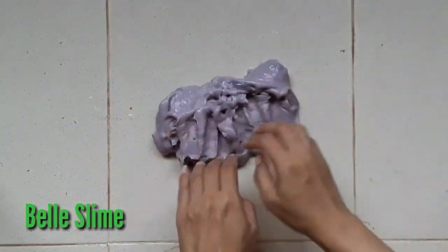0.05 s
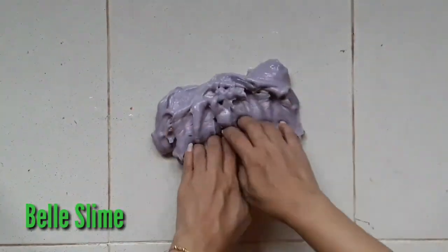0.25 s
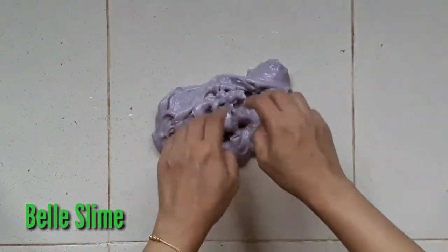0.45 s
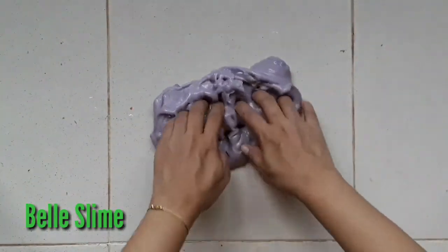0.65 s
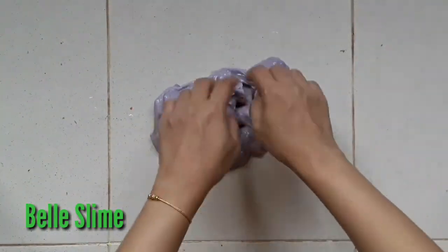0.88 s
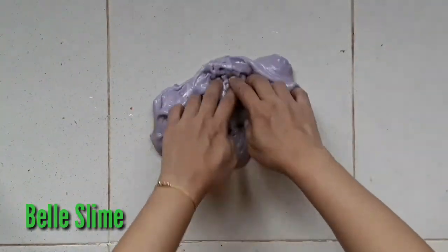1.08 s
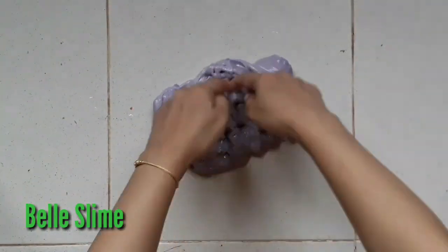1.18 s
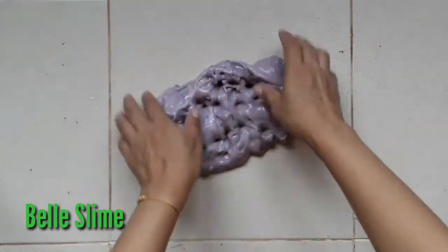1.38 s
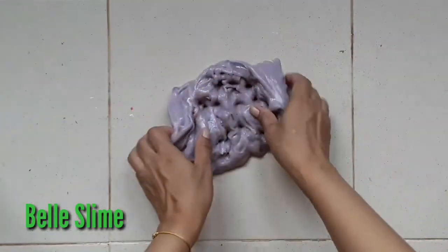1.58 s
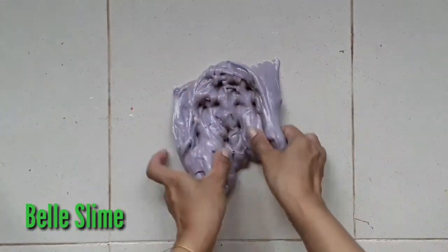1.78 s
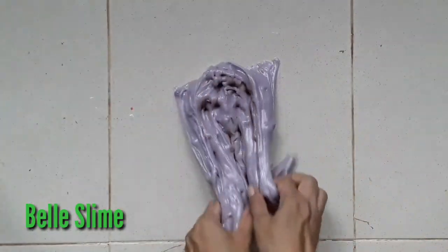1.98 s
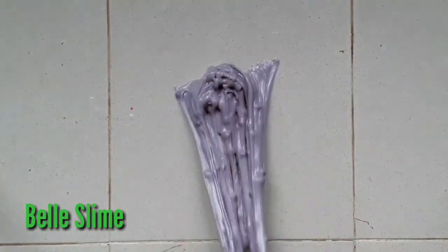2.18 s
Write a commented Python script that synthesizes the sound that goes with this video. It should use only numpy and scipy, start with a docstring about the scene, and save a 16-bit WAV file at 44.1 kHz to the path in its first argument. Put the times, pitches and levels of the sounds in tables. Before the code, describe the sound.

Sticky slime poked and folded by hand, wet air pockets snapping and small bubbles crackling

```python
"""A tiled floor in a bare room: fingers poke and fold sticky slime under a phone. Air pockets burst as
short wet snaps (filtered clicks roughened by brief tearing noise). Small bubbles crackle and squeak
(random clicks, some through a narrow resonance). Floor and wall echo each burst at once and the room
rings on for just under half a second (decaying noise), over room noise and faint hums (noise, sines)."""
import sys
import numpy as np
from scipy import signal
from scipy.fft import rfft, irfft
from scipy.io import wavfile
from scipy.ndimage import uniform_filter1d

SR = 44100
rng = np.random.default_rng(int(sys.argv[2]) if len(sys.argv) > 2 else 0)


def waveform_to_disk(signal):
    """Save audio, clipped to [-1, 1], as 16-bit WAV at the path in sys.argv[1]."""
    frames = np.transpose(np.atleast_2d(signal))
    scaled = np.clip(frames, -1, 1) * 32767
    samples = np.round(scaled).astype(np.int16)
    wavfile.write(sys.argv[1], SR, samples)


N = 99225
LEAD_S = 0.4  # rendered ahead of the start, then cut
LEAD = int(LEAD_S * SR)
M = N + LEAD


def undb(db):
    """Decibels to amplitude ratio."""
    return 10 ** (np.asarray(db) / 20)


def level(x, db):
    """Scale to an RMS level in dB re full scale."""
    return x * undb(db) / np.sqrt(np.mean(x ** 2))


def colour(x, points):
    """Filter by (frequency [Hz], gain [dB]) points joined on a log-frequency axis."""
    n = x.shape[-1]
    hz, db = np.array(points).T
    bin_hz = np.arange(n // 2 + 1) * SR / n + 1
    gain = undb(np.interp(np.log(bin_hz), np.log(hz), db))
    return irfft(rfft(x) * gain, n)


# Bursting air pockets: (time [s], strength [dB] at each of POCKET_BANDS_HZ from the second up)
AIR_POCKETS = [(0.2306, 3, -0.5, 3, 6, 0, -5.5, -22.5), (0.401, -24, -35, -40, -29, -30, -28, -29),
               (0.4193, -25, -13, -20.5, -21, -16, -27, -22),
               (0.4273, -1.5, -9, -20.5, -11, -27, -24.5, -39),
               (0.6425, -21, -57, -57, -28.5, -33, -32, -26.5), (0.8215, -31, -32, -41, -41, -33, -40, -34),
               (0.8454, -27, -1, -16, -14.5, -14, -15, -14), (0.8488, -12.5, -3, -8, -13, -26, -23, -23),
               (0.8695, -42, -4, -31, -34, -44, -30, -26), (0.8759, -13.5, 1, -6.5, -7, -16, -43, -42),
               (1.0537, -36, -23.5, -19.5, -26, -44, -31, -58), (1.0667, -28, -35, -43, -45, -40, -36, -30),
               (1.0766, -24, -33, -38, -38, -21.5, -25.5, -67),
               (1.116, -36, -27, -30, -24.5, -54, -52, -58), (1.1275, -12, -26, -52, -58, -23, -31, -33),
               (1.1674, -39, -29, -25, -31.5, -24, -20.5, -29.5),
               (1.1851, -31, -40, -44, -46, -53, -39, -33), (1.2121, -33, -52, -41, -44, -30.5, -38, -33),
               (1.2447, -15, -14, -25, -37, -31, -33, -43), (1.26, -37, -43, -29, -38, -24, -28, -38),
               (1.2674, -9.5, -8.5, -15.5, -14.5, -24, -17.5, -28),
               (1.5356, -8.5, -30, -26, -68, -34, -46, -40), (1.6032, -19, -28, -32, -32, -32.5, -43, -42),
               (1.6253, -26, -21, -33, -29, -29, -40, -38), (1.6305, -37, -39, -33, -46, -18.5, -38, -51),
               (1.6314, -11, -16, -17, -16.5, -24.5, -27, -45),
               (1.6975, -34, -24.5, -36, -34, -47, -31, -33), (1.7796, -46, -28, -21, -20.5, -53, -34, -45),
               (1.7898, -27, -49, -37, -44, -31, -31, -62), (1.819, -21, -46, -31, -23.5, -32, -38, -43),
               (1.8274, -30, -27, -44, -42, -35, -35, -52), (1.8658, -24, -49, -44, -35, -55, -38, -35),
               (1.9603, -30, -32, -33, -38, -41, -35, -33), (2.0129, -27, -37, -28, -35, -35, -32.5, -38),
               (2.0514, -15, -37, -25, -29, -30.5, -35.5, -34)]
# Pocket bursting before the start, only its ring is heard: (time [s], strengths [dB] as above)
POCKET_BEFORE_START = (-0.21, 17, -8, -7, -0.5, 5, 4.5, 7)
# Bands of the strengths, dull pop to bright tick: (frequency [Hz])
POCKET_BANDS_HZ = [110, 260, 670, 1480, 3150, 5800, 9100, 13300]
LOWEST_BAND_DB = -39  # re the second band
TEAR_DECAY_S = 0.002  # time constant
TEAR_DB, TEAR_DB_PER_DB = -12.5, 0.15  # re the click; rise with pocket strength
LAG_S, LAG_HZ = 0.001524, 1188  # delay of the lowest pitches; corner above which it vanishes


def pockets():
    """A burst is an abrupt coloured click, low part late, roughened by tearing, slightly more if strong."""
    rows = np.array([POCKET_BEFORE_START] + list(AIR_POCKETS))
    n = 2048
    t = np.arange(n) / SR
    hz = np.arange(n // 2 + 1) * SR / n + 1
    # cepstral fold: minimum phase, so the click starts abruptly
    fold = np.where((t > 0) & (t < n / 2 / SR), 2, t == 0)
    delay_s = LAG_S / (1 + (hz / LAG_HZ) ** 2) ** 2
    lag = np.exp(-2j * np.pi * np.cumsum(delay_s) * SR / n)
    out = np.zeros(M + n)
    for row, noise in zip(rows, rng.standard_normal((len(rows), n))):
        time_s, strengths_db = row[0], row[1:]
        bands_db = np.append(strengths_db[0] + LOWEST_BAND_DB, strengths_db)
        db = np.interp(np.log(hz), np.log(POCKET_BANDS_HZ), bands_db)
        tear_db = TEAR_DB + TEAR_DB_PER_DB * strengths_db[1:4].max()
        tearing = undb(tear_db) * noise * np.exp(-t / TEAR_DECAY_S)
        tearing[0] = 1  # the click itself
        # only the phase of the tearing is used: scattered in time, colour unchanged
        tear_phase = np.angle(rfft(tearing))
        cepstrum = irfft(np.log(undb(db)), n)
        burst = np.exp(rfft(cepstrum * fold) + 1j * tear_phase)
        i = int((time_s + LEAD_S) * SR)
        out[i:i + n] += irfft(burst * lag, n)
    return out[:M]


# Small bubbles while the slime is worked: (time [s], level [dB])
CRACKLE_LEVEL = [(0, -75), (.55, -107), (.8, -70), (.843, -60), (.86, -75), (1.0, -80), (1.08, -78),
                 (1.25, -66), (1.33, -74.5), (1.42, -79.5), (1.57, -69.5), (1.63, -70), (1.72, -62.5),
                 (1.8, -71), (1.9, -68.5), (2.05, -72), (2.25, -71)]
# Bubble click filter: (frequency [Hz], gain [dB])
BUBBLE_COLOUR = [(400, -36), (1000, -8), (2200, 13.5), (3800, -2.5), (6000, 4.5), (10000, 0), (15000, 9)]
# Thin squeak of the stretched slime: (time [s], level [dB])
SQUEAK_LEVEL = [(1.6, -85), (1.66, -86), (1.72, -78), (1.775, -62.5), (1.83, -74), (1.9, -74), (1.98, -84)]
CRACKLE_PER_S, CRACKLE_SCATTER_DB = 2500, 2  # mean rate; scale of the uneven sizes
SQUEAK_HZ, SQUEAK_WIDTH_HZ = 3770, 320
SQUEAK_SHARE = 0.25  # of the bubbles


def level_curve(table):
    """Amplitude over the whole render, joined in dB between (time [s], level [dB]) points."""
    time_s = np.arange(M) / SR - LEAD_S
    return undb(np.interp(time_s, *np.array(table).T))


def crackle():
    """Tiny bubbles of uneven size click at random; a share of them rings a narrow squeak."""
    chance, size, kind = rng.random((M, 3)).T
    bursts = chance < CRACKLE_PER_S / SR
    amplitude = undb(-CRACKLE_SCATTER_DB * np.log(1 - size))
    clicks = bursts * amplitude * np.sign(kind - 0.5)
    squeakers = clicks * (kind % 0.5 < SQUEAK_SHARE / 2)
    b, a = signal.iirpeak(SQUEAK_HZ, SQUEAK_HZ / SQUEAK_WIDTH_HZ, SR)
    squeak = level(signal.lfilter(b, a, squeakers), 0)
    bubbles = level(colour(clicks, BUBBLE_COLOUR), 0)
    return bubbles * level_curve(CRACKLE_LEVEL) + squeak * level_curve(SQUEAK_LEVEL)


# First echoes off floor and wall: (delay [s], level [dB re direct])
EARLY_ECHOES = [(.0028, -4), (.0043, -10.5), (0.0176, -11), (0.0194, -15)]
# Room ring by band: (centre [Hz], 60 dB decay time [s], relative level [dB])
RING_BANDS = [(253, 0.4, -8), (487, 0.39, -1.5), (1000, 0.36, -2), (2030, 0.47, -3), (4300, 0.4, -3),
              (7060, 0.4, -3.5), (13500, 0.31, -3.5)]
RING_BUILD_S, RING_DB = 0.011, 4.5  # build-up time; gain common to all bands


def room():
    """Impulse response: direct sound, early echoes, noise ring that builds up and decays by band."""
    n = SR
    t = np.arange(n) / SR
    log_hz = np.log(np.arange(n // 2 + 1) + 1.)
    log_centres = np.log(np.array(RING_BANDS)[:, 0])
    noise = rfft(rng.standard_normal(n))
    ring = np.zeros(n)
    for (_, t60_s, db), one_band in zip(RING_BANDS, np.eye(len(RING_BANDS))):
        band = irfft(noise * np.interp(log_hz, log_centres, one_band), n)
        ring += band * undb(db - 60 * t / t60_s)
    ring *= 1 - np.exp(-(t / RING_BUILD_S) ** 2)
    out = ring * undb(RING_DB) / np.sqrt(SR * 0.026)
    out[0] += 1  # direct sound
    for delay_s, db in EARLY_ECHOES:
        out[int(delay_s * SR)] += undb(db)
    return out


# Room noise spectrum: (frequency [Hz], relative density [dB per Hz])
ROOM_NOISE_COLOUR = [(15, -39), (25, -4), (185, -1.5), (317, -3), (439, -5), (911, -7.5), (1190, -10.5),
                     (2610, -20.5), (3820, -24.5), (14000, -39.5), (16000, -28.5)]
ROOM_NOISE_DB, SWELL_DB = -61, 0.52  # RMS level before swelling; RMS swell
HUM_HZ, HUM_DB, HUM_WANDER_HZ = 311.5, -67, 0.8  # wander is RMS
LOW_HUM_HZ, LOW_HUM_DB, LOW_HUM_WANDER_HZ = 132, -74.5, 3.2


def background():
    """Coloured noise that swells slightly, a nearly steady sine hum, a fainter, less steady low one."""
    swell, waver = uniform_filter1d(rng.standard_normal((2, N)), SR // 6, axis=1)
    swell, waver = swell / swell.std(), waver / waver.std()
    noise = level(colour(rng.standard_normal(N), ROOM_NOISE_COLOUR), ROOM_NOISE_DB)
    noise = noise * undb(SWELL_DB * swell)
    hum = np.sin(2 * np.pi * np.cumsum(HUM_HZ + HUM_WANDER_HZ * waver) / SR)
    low_hum = np.sin(2 * np.pi * np.cumsum(LOW_HUM_HZ + LOW_HUM_WANDER_HZ * swell) / SR)
    return noise + level(hum, HUM_DB) + level(low_hum, LOW_HUM_DB)


# Background side signal: (frequency [Hz], gain [dB re middle])
SIDE_BACKGROUND_COLOUR = [(60, -31), (150, -26.5), (500, -24), (2000, -14.5), (8000, -15), (13000, -3.5)]
SIDE_DECAY_DB = -50


def scene():
    """Nearly mono; a faint side signal of decaying noise and hiss is added."""
    slime = pockets() + crackle()
    mid = signal.fftconvolve(slime, room())[LEAD:M] + background()
    decaying_noise = room() - room()  # direct sound and echoes cancel
    side = undb(SIDE_DECAY_DB) * signal.fftconvolve(slime, decaying_noise)[LEAD:M]
    side = side + colour(background(), SIDE_BACKGROUND_COLOUR)
    return mid + side * np.array([[1], [-1]])


# Overall tone, treble falling steeply near 15.7 kHz: (frequency [Hz], gain [dB])
OVERALL_TONE = [(30, -24), (55, 2), (80, 0), (1200, 0.5), (1900, 3), (2900, 0.5), (4000, 3), (5200, 1),
                (8000, 2), (9000, 5), (11000, 4), (15400, -4), (15900, -18)]
TOP_HZ = 16600


def record(dry):
    """Overall tone with a steep treble fall near 15.7 kHz, then a steep low-pass at the top."""
    padded = np.pad(dry, ((0, 0), (0, 1)), "reflect")  # even length
    toned = colour(padded, OVERALL_TONE)[:, :N]
    low_pass = signal.ellip(10, 0.2, 80, TOP_HZ, fs=SR, output="sos")
    return signal.sosfilt(low_pass, toned)


dry = scene()
out = record(dry)
waveform_to_disk(out)
```